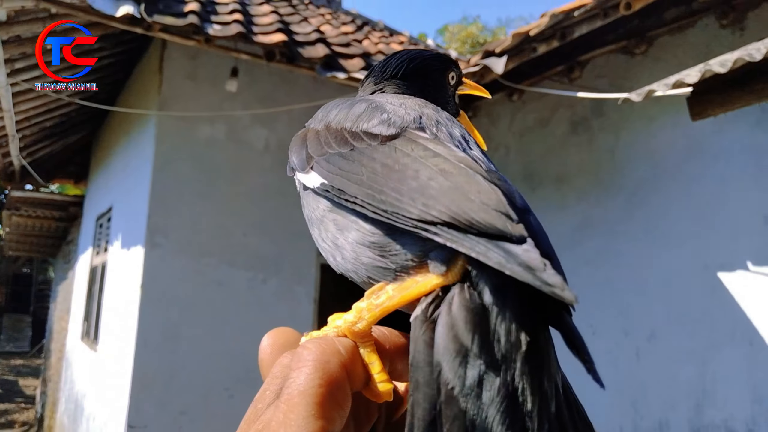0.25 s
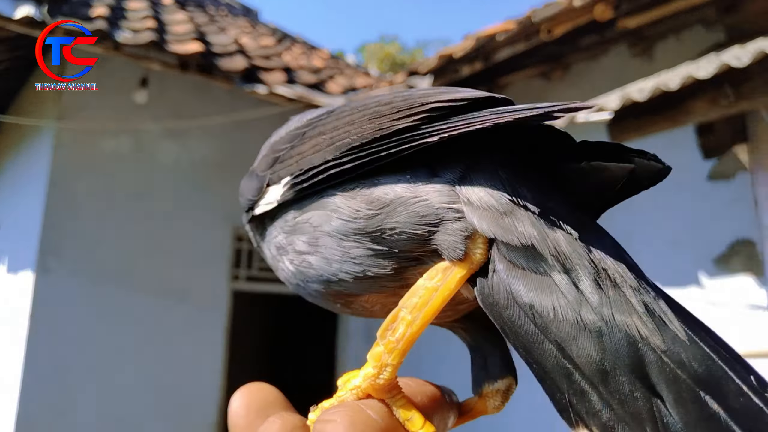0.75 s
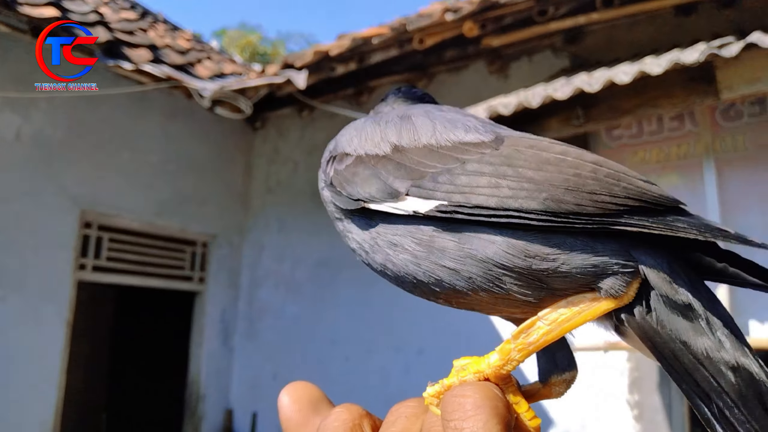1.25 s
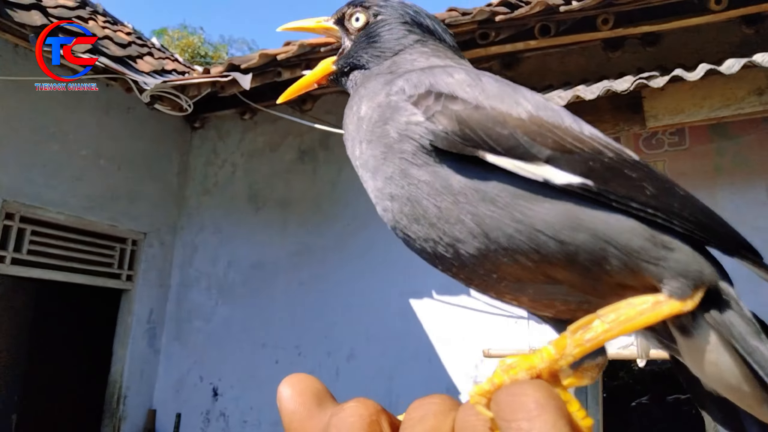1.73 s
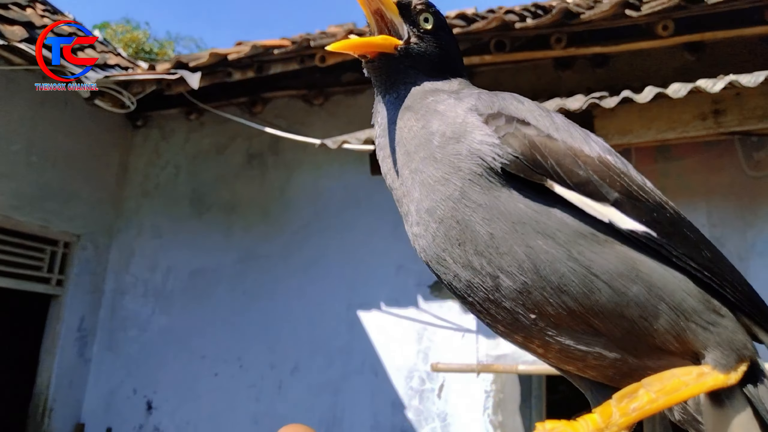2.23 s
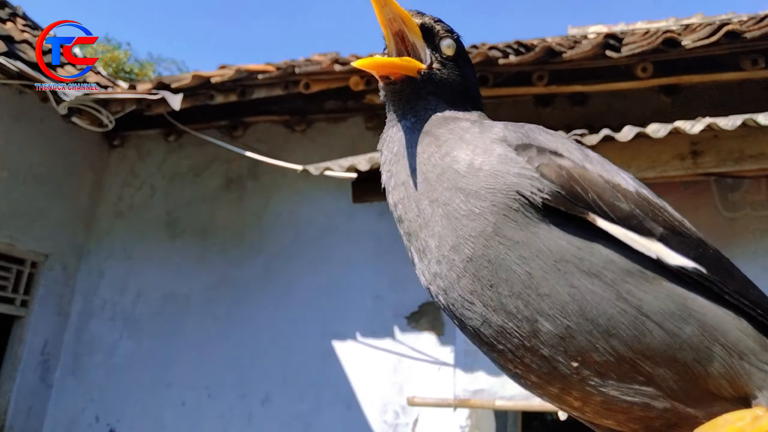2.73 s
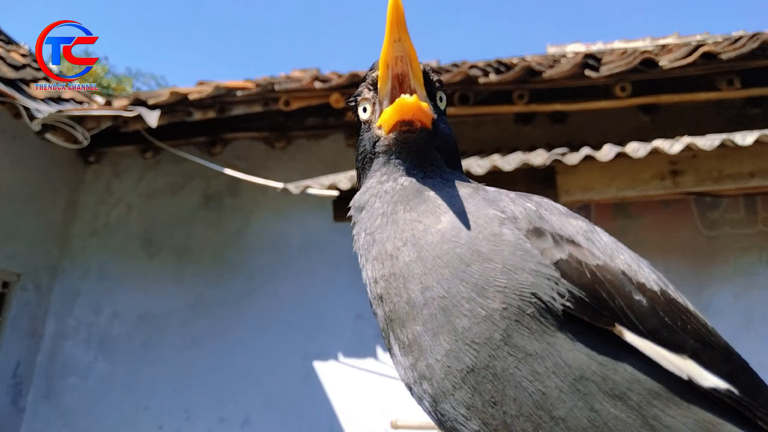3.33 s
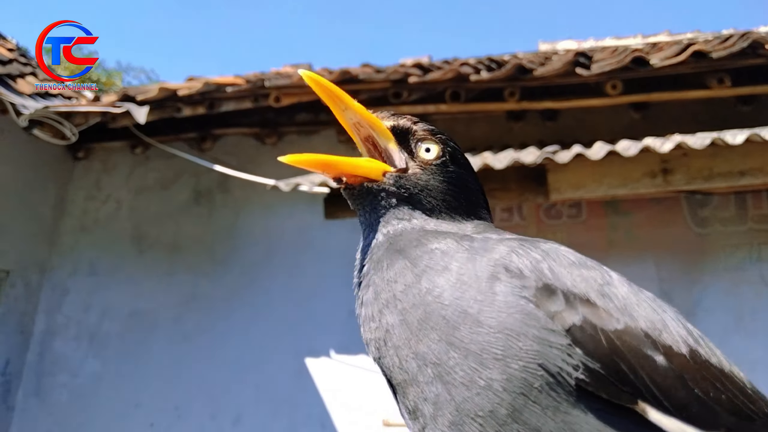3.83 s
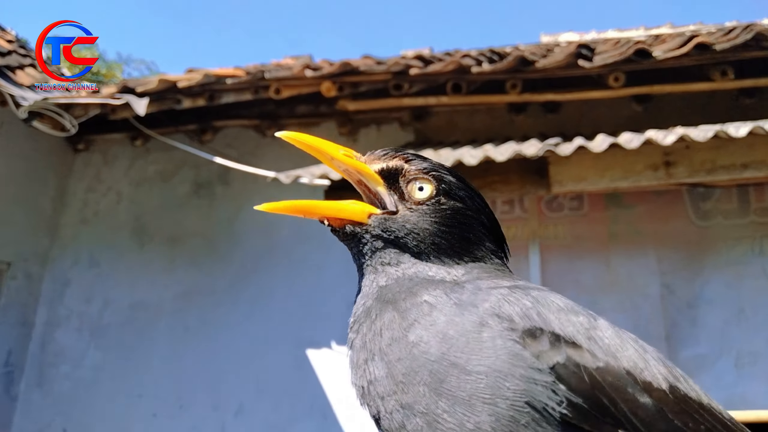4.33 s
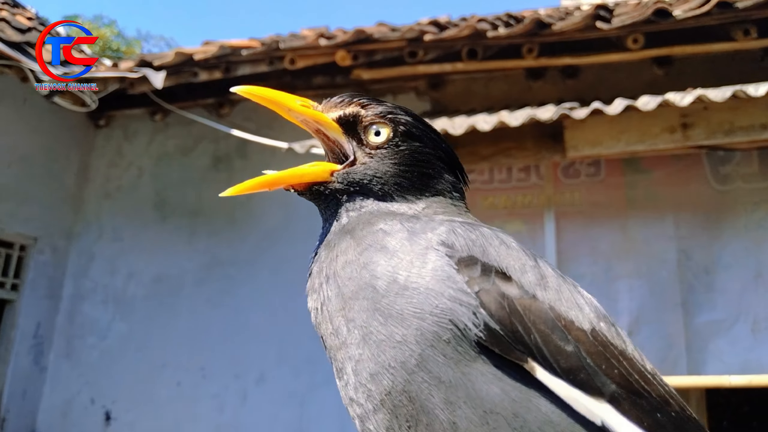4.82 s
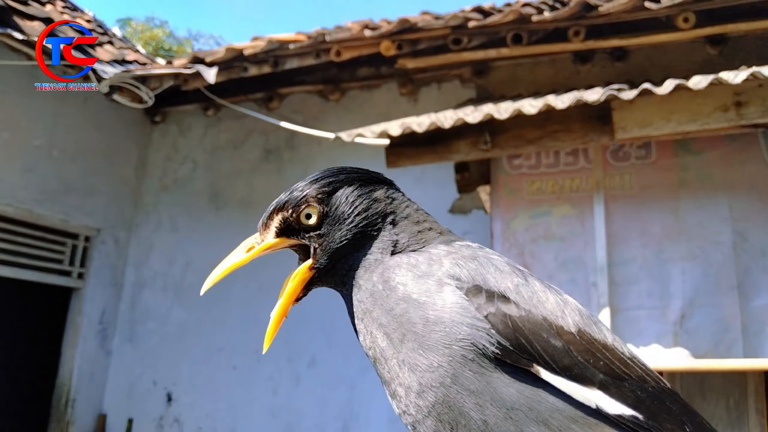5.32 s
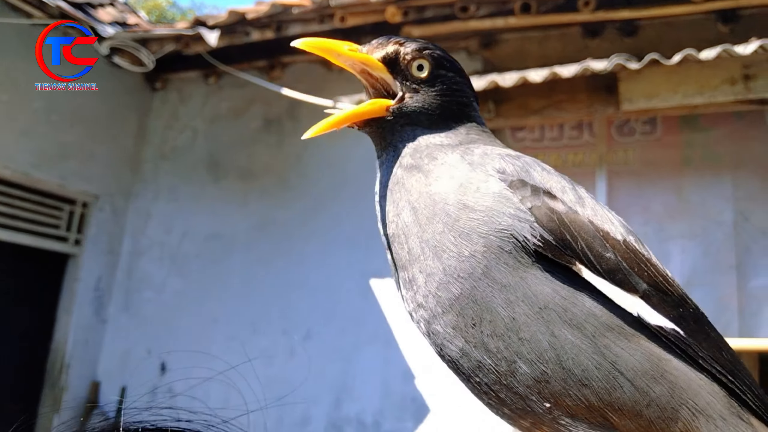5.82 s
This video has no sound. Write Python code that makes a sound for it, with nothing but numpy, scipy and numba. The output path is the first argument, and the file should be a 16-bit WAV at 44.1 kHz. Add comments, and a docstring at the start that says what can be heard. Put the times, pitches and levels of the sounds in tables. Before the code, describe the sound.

Close raspy chatter, sharp high screeches and short chirps from a pet myna, with another bird whistling softly, thinning to single chips.

```python
"""Raspy chatter, rising screeches and short chips from a myna held close to the microphone in a yard.
Its syrinx sweeps through arched notes, coloured by the throat and open beak. A softer bird repeats
breathy whistles, and a beak snaps twice. House walls add a short tail; behind lie a low outdoor rumble
and a far machine hum. A 10 ms electronic echo doubles everything, and a limiter ducks the background
under each loud call."""
import sys
import numpy as np
from scipy import signal
from scipy.fft import rfft, irfft, next_fast_len
from scipy.io import wavfile
from scipy.ndimage import uniform_filter1d, minimum_filter1d, map_coordinates
from numba import njit

SR = 44100
rng = np.random.default_rng(int(sys.argv[2]) if len(sys.argv) > 2 else 0)


def file_out(sig):
    """Save sig as 16-bit WAV at sys.argv[1]."""
    # one column per channel
    cols = np.atleast_2d(sig).T
    # limit, then scale
    lim = np.clip(cols, -1, 1)
    pcm = np.round(lim * 32767).astype(np.int16)
    wavfile.write(sys.argv[1], SR, pcm)


N = 267598
T = np.arange(N) / SR

# resonances of the myna's throat and open beak: (frequency [Hz], gain [dB])
THROAT_RESPONSE = [(1100, -20), (1900, -19.5), (2450, -23.5), (2900, -20.5), (3600, -7), (4200, -4.5),
                   (4700, -6.5), (5400, -16), (6200, -27.5), (7300, -22.5), (8400, -16), (10700, -23.5),
                   (12300, -29.5), (15000, -32.5)]


def myna(air_db=-25, air_colour=0.86):
    """The myna at the microphone: voiced notes, plus turbulent air that grows with the rasp."""
    # notes of each kind of call, before a call stretches, transposes and levels them:
    # (delay [s], length [s], start pitch [Hz], middle pitch [Hz], end pitch [Hz], scoop [share of pitch],
    #  level [dB], change over the note [dB], first rasp [0-1], last rasp [0-1], brightness [dB/octave])
    chatter_notes = [(.002, 0.019, 1590, 1862, 1820, 0.3, 2.5, 5, 0.2, 0.034, -2.5),
                     (.029, 0.02, 2050, 2133, 1930, 0.019, 8.5, 10, 0.13, 0.25, 0.5),
                     (.044, .048, 3120, 2725, 2462, 0.35, 5.5, -5, 0.22, 0.2, 0.5),
                     (.086, 0.027, 2456, 2375, 2248, 0, 1.5, -4.5, 0.54, 0.89, 0.5)]
    screech_notes = [(0, .045, 3570, 5470, 3800, .04, 2.6, -13.5, 0.079, 0.12, 0.74),
                     (.046, .056, 3077, 4520, 4718, 0.24, 6.95, -8.5, 0.35, 0.12, 0.58)]
    twit_notes = [(0, 0.0256, 2005, 1774, 2040, 0.0093, 5.6, 11, .04, 0.031, -0.17),
                  (.020, .035, 2654, 2256, 2118, 0.18, 3.5, 17.5, .08, 0.3, -2.4)]
    peep_notes = [(.003, .010, 2184, 2480, 2770, 0.0012, 0, 1, 0.017, .02, 0),
                  (.011, .022, 2730, 2210, 1960, 0.029, 0, -6, .02, .02, 0)]
    chip_notes = [(0, 0.0116, 1800, 2000, 2130, 0, -12, -1, .7, 0.18, 0),
                  (.008, 0.025, 2456, 1907, 1807, 0.124, 2.5, -9.5, .02, 0.034, 0.0045)]
    chuck_notes = [(0, 0.0496, 1550, 1440, 1280, 0, -3, 8.1, .03, .05, 0)]
    # calls of each kind: (onset [s], length [factor], pitch [factor], level [dB],
    #  throat resonance [factor], brightness [dB/octave])
    chatter_calls = [(-.034, 1.078, 0.99, 3, 0.91, 4), (0.108, .98, 0.987, 3, 0.92, 4),
                     (0.248, 1.08, 0.98, 2.5, 0.92, 3.5), (3.885, 1.06, 0.99, -5.5, 0.92, -2),
                     (4.035, 1.043, 1.001, -2, 0.91, 0), (4.181, 1.03, 1.003, 0.5, 0.91, 0.5),
                     (4.342, 0.97, 1.007, 1.5, 0.9, 0.5)]
    screech_calls = [(1.35, 1.004, 1.04, -0.5, 0.97, -3), (1.622, 1.047, 0.99, -2, 1, -1),
                     (1.856, 1.04, 0.991, -2, 1, -1), (2.361, 0.98, 1.015, 3, 0.97, 4)]
    twit_calls = [(2.607, 0.97, .99, 0, 1.037, -2), (2.765, 0.88, 1.01, 0, 1.04, -0.25)]
    peep_calls = [(3.336, 0.91, 0.996, 1.1, 0.982, -3.5)]
    chip_calls = [(3.549, 1.09, 0.98, -1, 0.94, -4.5), (3.75, 1.14, 0.97, -1, 0.94, -4.5),
                  (5.429, .95, 0.92, -9.5, 1, -7.5)]
    chuck_calls = [(6.030, 1.001, 1.001, -6, 0.86, -11)]
    repertoire = [(chatter_notes, chatter_calls), (screech_notes, screech_calls),
                  (twit_notes, twit_calls), (peep_notes, peep_calls),
                  (chip_notes, chip_calls), (chuck_notes, chuck_calls)]
    voice, air = np.zeros(N), np.zeros(N)
    for notes, calls in repertoire:
        for call in calls:
            for note in notes:
                i, tone, flow = syrinx(note, call)
                voice[i] += tone
                air[i] += flow
    turbulence = noise([(hz, air_colour * db) for hz, db in THROAT_RESPONSE])
    return voice + undb(air_db) * air * turbulence


def syrinx(note, call, warble=0.01, jitter=0.0846, grit=0.078, shimmer_db=2.0, rolloff_db=-2):
    """One myna note, its harmonics gliding through the throat resonances: (indices, tone, airflow)."""
    onset, stretch, pitch, call_db, throat_scale, call_tilt = call
    delay, length, *arch_hz, scoop, note_db, change_db, first_rasp, last_rasp, note_tilt = note
    scoop_s, attack_share, release_share = 0.0025, 0.18, 0.19
    tilt = call_tilt + note_tilt
    start = onset + delay * stretch
    i = span(start, start + length * stretch)
    if not len(i):
        return i, 0, 0
    t = (T[i] - start) / stretch
    along = np.clip(t / length, 0, 1)
    hz = np.polyval(np.polyfit([0, .5, 1], arch_hz, 2), along)
    hz *= 1 - scoop * np.exp(-t / scoop_s)  # slides into the note from below
    rasp = first_rasp + (last_rasp - first_rasp) * along ** 2.73
    # a little rasp makes the pitch flutter; more of it locks the syrinx into a doubled period
    flutter = np.interp(rasp, [.05, .3, .7], [0, .3, .08])
    doubling = np.clip((rasp - .3) / .4, 0, 1)
    hz *= pitch * (1 + warble * wander(t, 239) + jitter * flutter * wander(t, 600))
    phase = 2 * np.pi * np.cumsum(hz) / SR
    voice = 0
    for k in np.arange(1, 17) / 2:  # harmonics, and the half-harmonics of the doubled period
        throat_hz = k * hz / throat_scale
        octaves = np.log2(np.clip(throat_hz, 1800, 9000) / 4000)
        gain = undb(colour_db(throat_hz, THROAT_RESPONSE) + rolloff_db * (k - 2) + tilt * octaves)
        share = doubling * undb(-7 - 3 * abs(k - 1.5)) if k % 1 else 1
        grain = 1 + grit * np.sqrt(k) * wander(t, 1483)  # turbulence roughens each harmonic on its own
        in_band = k * hz < SR / 2.2
        voice += share * gain * grain * in_band * np.sin(k * phase)
    # the breath behind the note swells, holds and dies away
    edges = np.clip(np.minimum(along / attack_share, (1 - along) / release_share), 0, 1)
    swell = edges * undb(call_db + note_db + change_db * (along - .5) + shimmer_db * wander(t, 506.6))
    airflow = swell * np.hypot(rasp, .1) * undb(tilt)
    return i, voice * swell, airflow


def whistler(start_hz=1843, fall_bend=0.79, attack_s=0.026, release_s=0.039, overtone_db=-56):
    """The softer bird: nearly pure tones that rise to a crest and sink again, each in a puff of hiss."""
    # whistles: (start [s], crest [s], end [s], crest pitch [Hz], level [dB],
    #  change over the whistle [dB], breath level [dB])
    whistle_arches = [(0.423, 0.539, 0.631, 2439, -17, -7, -35.5),
                      (0.712, 0.818, 0.91, 2550, -27, -10.5, -32.5), (.745, .835, .885, 2820, -28, 14, -54),
                      (0.804, 0.854, .908, 2463, -26.5, 52.5, -43),
                      (1.025, 1.11, 1.2, 2297, -7.5, 3.5, -33), (1.314, 1.399, 1.468, 2387, -9, -3, -27.5),
                      (1.598, 1.698, 1.755, 2278, -13.5, -10, -36),
                      (1.912, 1.997, 2.065, 2210, -12, -9, -37),
                      (2.162, 2.234, 2.295, 2260, -12, -3.5, -38.5),
                      (2.408, 2.49, 2.545, 2170, -12, 3, -41), (2.629, 2.731, 2.81, 2182, -12.5, -4, -43),
                      (2.88, 2.969, 3.045, 2357, -20, -1, -39), (3.145, 3.263, 3.27, 2360, -16, -19.5, -37)]
    # air rushing through the beak: (frequency [Hz], relative level [dB])
    breath_spectrum = [(1500, -2.5), (2400, 10), (3500, -15), (5600, -9.5), (6800, 1.5), (8200, -1),
                       (10000, -1), (11200, -11.5), (14500, -15), (16000, -35)]
    out, hiss = np.zeros(N), noise(breath_spectrum)
    for start, crest, end, crest_hz, db, change_db, breath_db in whistle_arches:
        i = span(start, end)
        t = T[i]
        off_centre = (t - start) / (end - start) - .5
        bend = (crest_hz - start_hz) * np.where(t < crest, 1, fall_bend)
        hz = crest_hz - bend * ((t - crest) / (crest - start)) ** 2
        waver = 0.076 * undb(breath_db - db) * wander(t, 507)  # the breathier, the less steady
        sway = 0.0079 * wander(t, 65.3)
        phase = 2 * np.pi * np.cumsum(hz * (1 + waver + sway)) / SR
        tone = np.sin(phase) + undb(overtone_db) * np.sin(2 * phase)
        puff = undb(breath_db) * (1 - 2 * off_centre ** 2) * hiss[i]
        fade_in = np.clip((t - start) / attack_s, 0, 1) ** 0.83
        fade_out = np.clip((end - t) / release_s, 0, 1) ** 0.82
        out[i] += fade_in * fade_out * (undb(db + change_db * off_centre) * tone + puff)
    return out


def beak_snaps(rise_s=0.0007, contact_s=0.0017):
    """A beak closes with a bright tick that dies in a few milliseconds."""
    # contacts, the first two heard as one snap: (time [s], level [dB], decay [s])
    beak_contacts = [(5.2797, -28, 0.0014), (5.29, -30, 0.004), (5.3648, -15, 0.0026)]
    # colour of the tick: (frequency [Hz], relative level [dB])
    beak_spectrum = [(2000, -37), (4500, -14.5), (7500, -13), (9500, 3), (12000, -17), (15000, -5),
                     (16500, -20)]
    force = np.zeros(N)
    for start, db, decay_s in beak_contacts:
        rise = np.clip((T - start) / rise_s, 0, 1)
        fall = np.exp(-np.maximum(T - start - contact_s, 0) / decay_s)
        force += undb(db) * rise * fall
    return force * noise(beak_spectrum)


def house_walls(x, t60_s=0.13, gap_s=0.0028, wet_db=-18, sheen_db=5, sheen_hz=8500):
    """Walls and eaves scatter a short tail back to the microphone; hard plaster keeps it bright."""
    t = T[:SR // 2]
    tail = rng.standard_normal(len(t)) * undb(-60 * t / t60_s) * (t > gap_s)
    tail /= np.linalg.norm(tail)
    tail += undb(sheen_db) * signal.lfilter(*signal.iirpeak(sheen_hz, Q=2.5, fs=SR), tail)
    return x + undb(wet_db) * signal.fftconvolve(x, tail)[:N]


def yard_background(rumble_db=-32.5, throb_db=2.5):
    """Outdoor rumble and hiss, an unsteady machine hum far off and a few faint, distant tones."""
    # open air in the yard: (frequency [Hz], relative level [dB])
    yard_spectrum = [(20, -3.5), (30, 0.5), (40, -10), (52, -26), (66, 3.5), (85, -5.5), (125, -3),
                     (190, -12), (600, -16), (1000, -17.5), (2300, -18), (4000, -30), (6500, -35),
                     (9300, -25), (11500, -42), (15500, -42.5)]
    # partials of the far machine: (frequency [Hz], level [dB], drift [Hz])
    hum_partials = [(29, -48.5, 3.22), (86.1, -40, 1.29), (121.4, -43.5, 1.84), (598, -48, 6.12)]
    # distant tones: (start [s], end [s], frequency [Hz], level [dB])
    far_tones = [(0.803, 1.286, 1100, -43), (.82, 1.088, 388.6, -43.5), (1.041, 1.293, 1380, -41.5)]
    # slow swell over all three: (time [s], gain [dB])
    swell_curve = [(0, 5.5), (.5, -1.5), (.95, 1.5), (1.35, 1), (1.8, -3), (2.3, 0), (3.1, 0), (3.8, -3),
                   (5.4, 1)]
    out = noise(yard_spectrum) * undb(rumble_db)
    for hz, db, drift_hz in hum_partials:
        throb = undb(db + throb_db * wander(T, 11))
        phase = 2 * np.pi * np.cumsum(hz + drift_hz * wander(T, 12)) / SR
        out += throb * np.sin(phase)
    for start, end, hz, db in far_tones:
        i = span(start, end)
        phase = 2 * np.pi * np.cumsum(hz * (1 + 0.014 * wander(T[i], 62))) / SR
        out[i] += undb(db) * signal.windows.tukey(len(i)) * np.sin(phase)
    return out * undb(np.interp(T, *np.transpose(swell_curve)))


def undb(db):
    """Decibels to gain."""
    return 10 ** (np.asarray(db) / 20)


def colour_db(hz, points):
    """Level of a spectrum at hz, interpolated on a log-frequency axis."""
    point_hz, db = np.transpose(points)
    return np.interp(np.log(np.maximum(hz, 1)), np.log(point_hz), db)


def noise(points):
    """Noise of unit rms with the given spectrum."""
    size = next_fast_len(N)
    gain = undb(colour_db(np.fft.rfftfreq(size, 1 / SR), points))
    x = irfft(rfft(rng.standard_normal(size)) * gain, size)[:N]
    return x / x.std()


def wander(t, rate):
    """Smooth random motion of about unit spread that changes rate times a second."""
    return map_coordinates(rng.standard_normal(4096), [(t - t[0]) * rate], order=3, mode="mirror")


def span(start, end):
    """Sample indices between two times."""
    return np.arange(max(int(start * SR), 0), min(int(end * SR), N))


@njit
def follow_peaks(x, fall):
    """Envelope that jumps up at once and sinks slowly."""
    out, held = np.empty(len(x)), 0.
    for i in range(len(x)):
        held = max(x[i], held * fall)
        out[i] = held
    return out


def scene():
    """What reaches the one microphone: the birds between the house walls, over the background."""
    birds = myna() + whistler() + beak_snaps()
    return (house_walls(birds) + yard_background())[None]


def record(dry, echo_s=0.01, echo_gain=0.97, ceiling=1.0, release_s=0.1, top_hz=15700):
    """After the microphone: a single electronic echo, a look-ahead limiter and a steep top cut."""
    mic, lag = dry[0], round(echo_s * SR)
    doubled = mic + echo_gain * np.pad(mic, (lag, 0))[:N]
    peak = follow_peaks(np.abs(doubled), np.exp(-1 / (release_s * SR)))
    gain = ceiling / np.maximum(peak, ceiling)
    gain = uniform_filter1d(minimum_filter1d(gain, size=90), size=90)  # eases down 2 ms ahead of a peak
    top_cut = signal.ellip(10, .2, 85, top_hz, fs=SR, output="sos")
    return signal.sosfilt(top_cut, doubled * gain)[None]


dry = scene()
out = record(dry)
file_out(out)
```